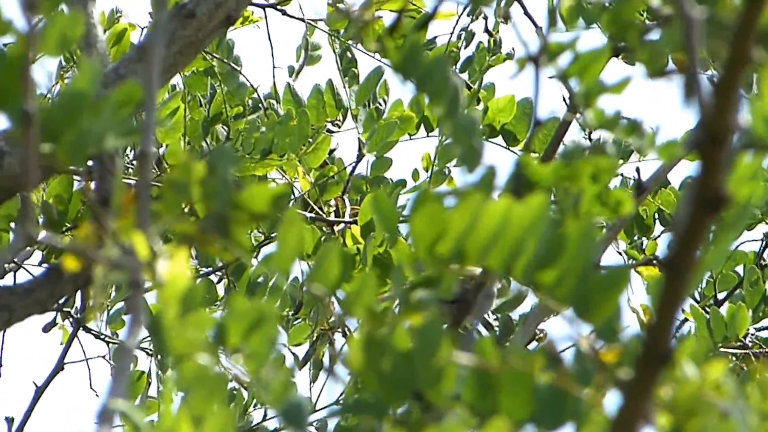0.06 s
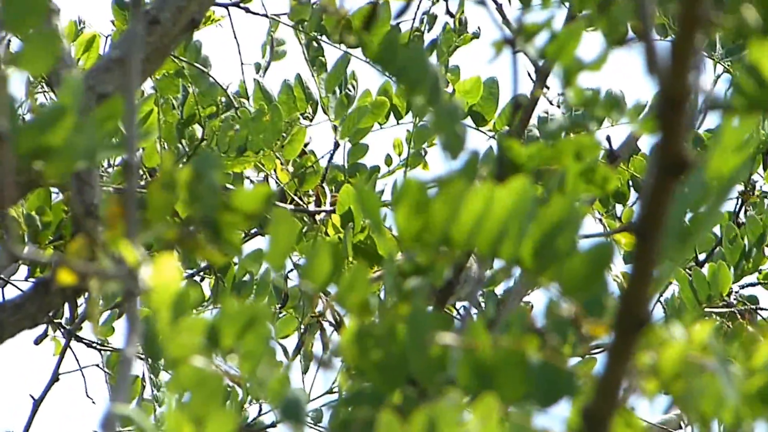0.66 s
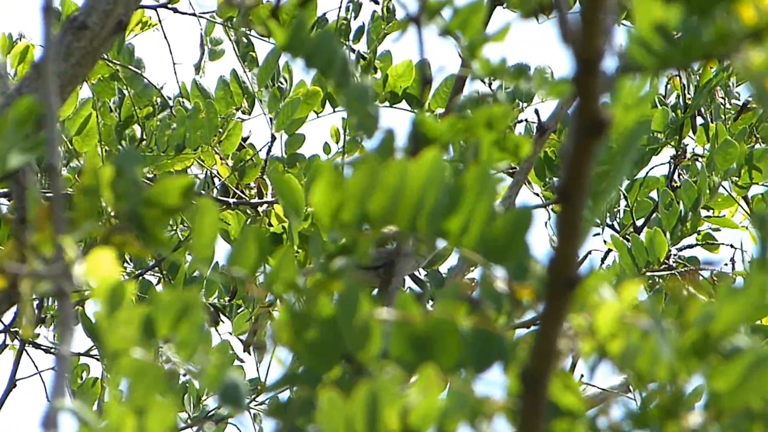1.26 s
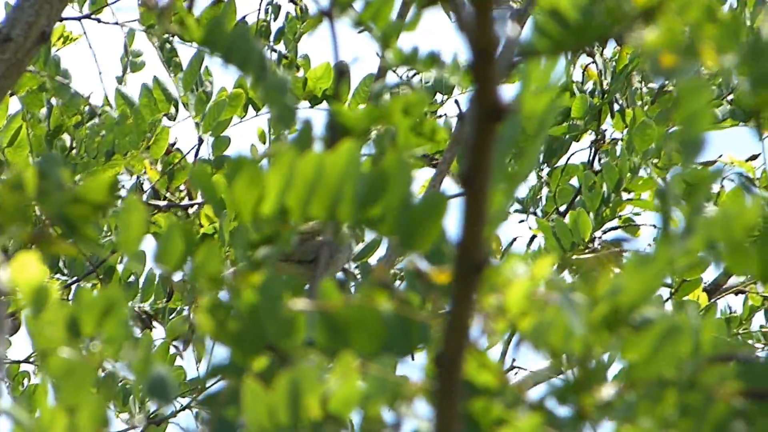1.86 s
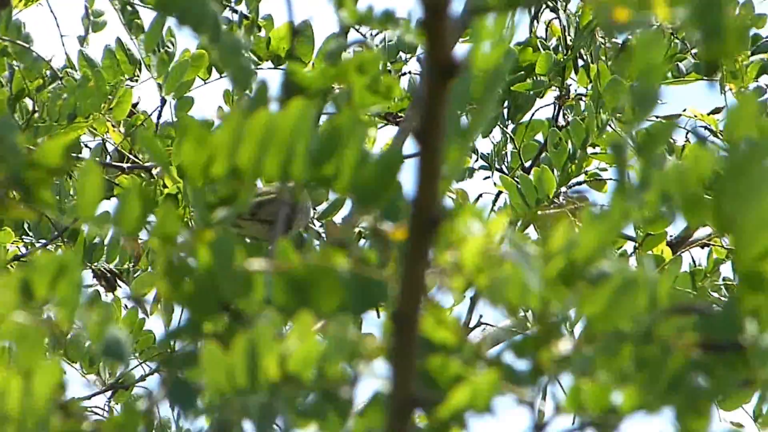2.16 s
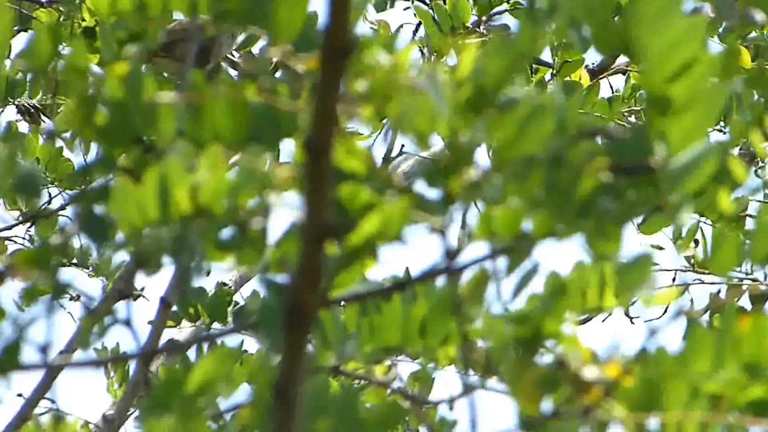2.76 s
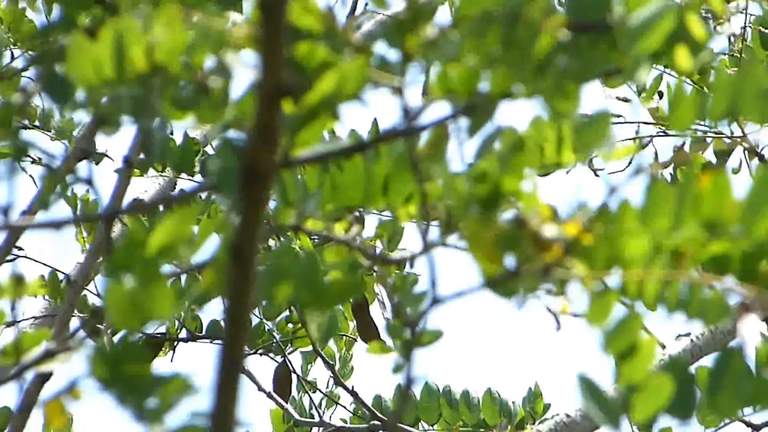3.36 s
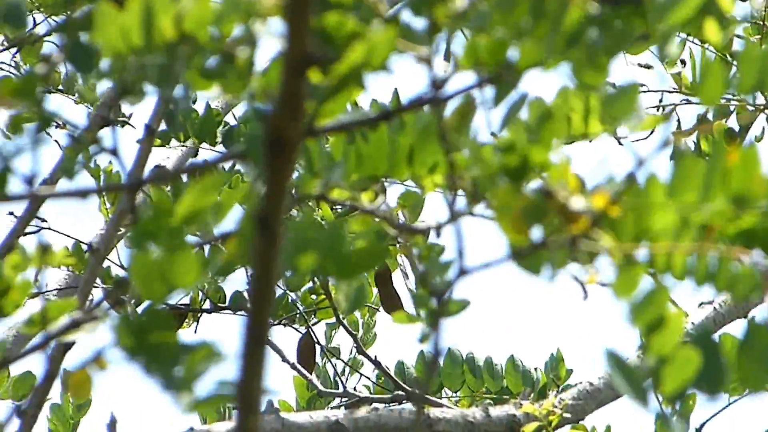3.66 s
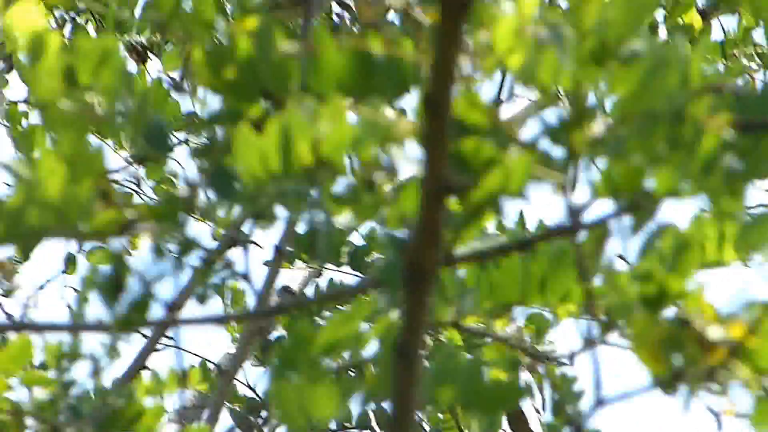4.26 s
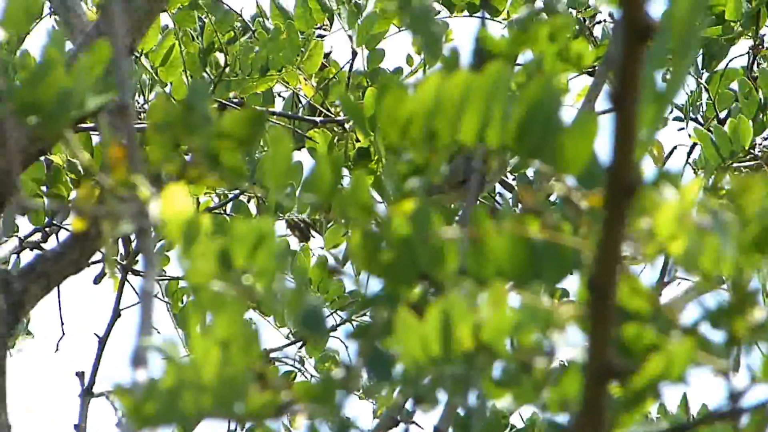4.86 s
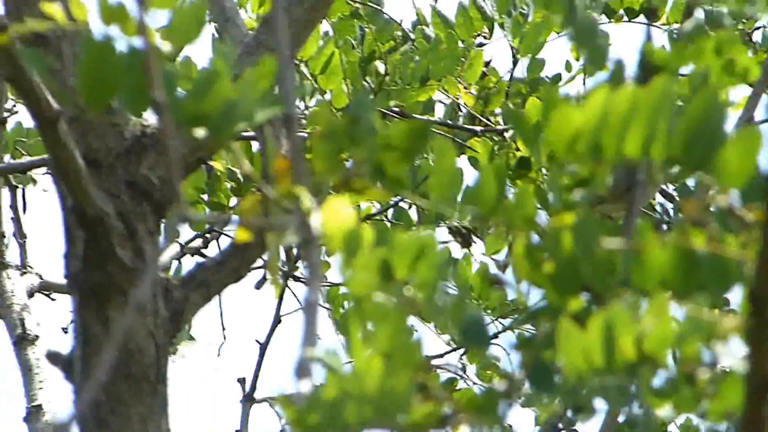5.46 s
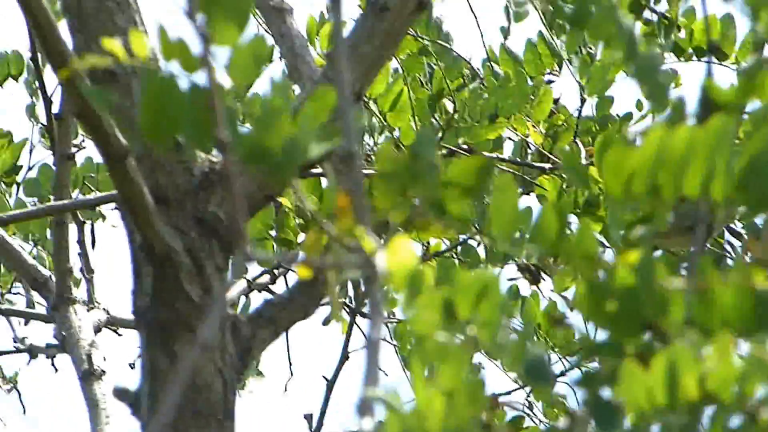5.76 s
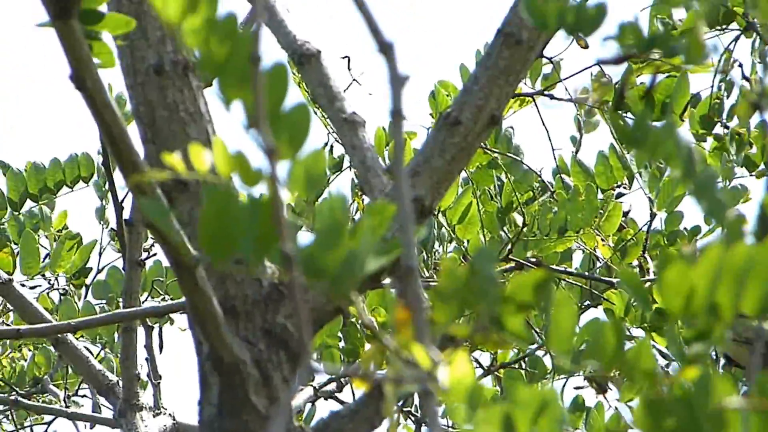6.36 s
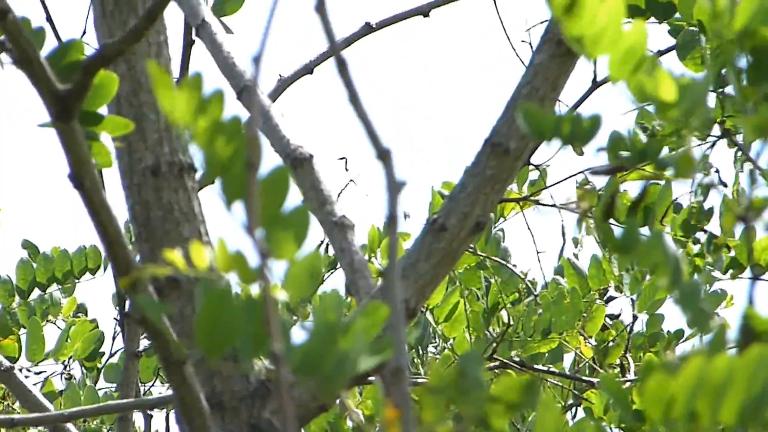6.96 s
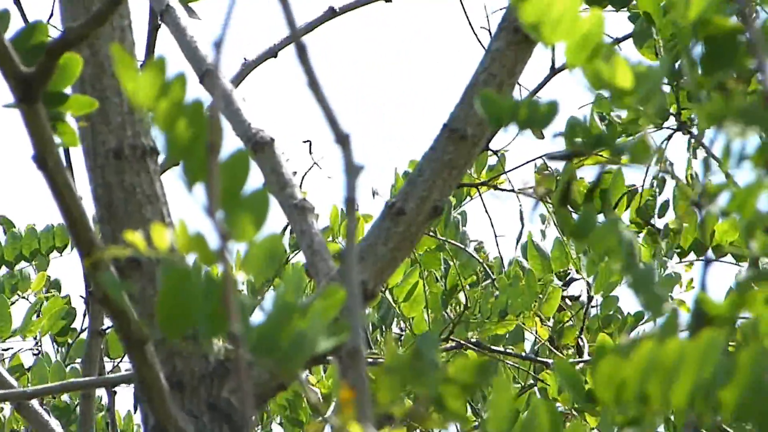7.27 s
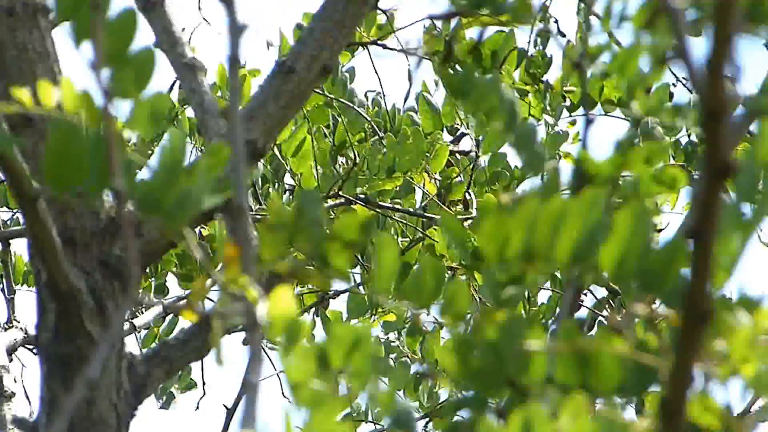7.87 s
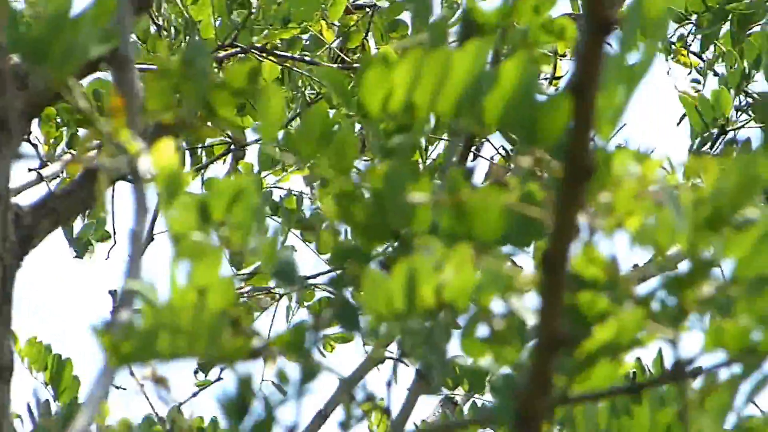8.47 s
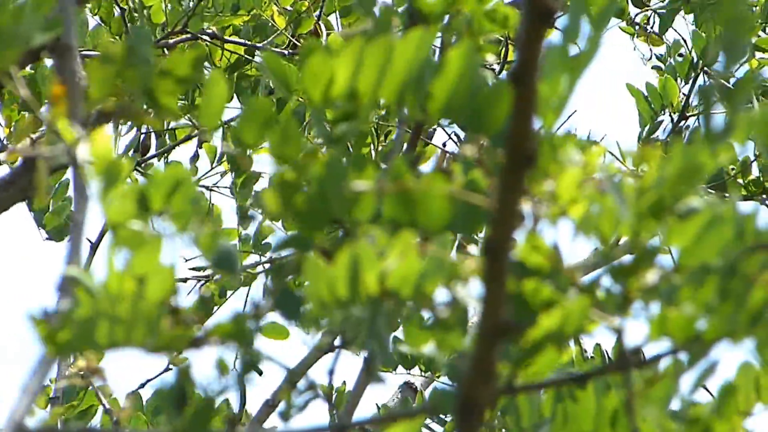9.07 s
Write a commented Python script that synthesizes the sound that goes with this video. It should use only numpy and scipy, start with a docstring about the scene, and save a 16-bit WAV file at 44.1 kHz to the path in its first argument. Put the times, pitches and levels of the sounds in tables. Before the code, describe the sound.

Short, clear chirps from a small bird in a tree, with faint calls from other birds and a quiet town hum behind.

```python
"""Songbird in a quiet suburb

A small bird in a leafy tree whistles short notes from its syrinx: rising chips, falling chews between.
Trunks and walls throw back brief echoes. Other birds add thin calls, and puff air through their throats
for churrs, chacks and a dry chatter. A hand-held camera ticks and scuffs over the hum of the town."""
import sys
import numpy as np
from scipy import signal
from scipy.fft import rfft, irfft, next_fast_len
from scipy.io import wavfile
from scipy.ndimage import uniform_filter1d

SR = 44100
rng = np.random.default_rng(int(sys.argv[2]) if len(sys.argv) > 2 else 0)


def transcribe(signal):
    """Save signal, clipped to [-1, 1], as a 16-bit WAV file at the path in sys.argv[1]."""
    frames = np.atleast_2d(signal).T
    limited = np.clip(frames, -1, 1)
    pcm = np.round(limited * 32767).astype(np.int16)
    wavfile.write(sys.argv[1], SR, pcm)


N = 402633

# rising notes; a negative droop keeps rising
# (time [s], top pitch [Hz], final droop [Hz], attack [s], level [dB], rasp, breath and overtones [dB])
CHIP_NOTES = [(.196, 3295, 150, 0.026, -21, 2), (1.152, 3590, 200, .031, -20.3, 2.5),
              (1.672, 2950, 330, 0.026, -19.5, -0.5), (2.027, 3420, 400, 0.027, -20.5, 3.5),
              (2.679, 3050, 135, .031, -17, -2.5), (3.068, 3370, 120, 0.026, -17.5, 4),
              (3.819, 3340, 350, 0.024, -16.5, 1.5), (4.605, 3037, 176, 0.028, -17, -1.5),
              (4.964, 3285, -170, 0.02, -17, 2.5), (5.678, 3372, 250, 0.024, -17.5, 1),
              (6.451, 3224, 480, .027, -21.5, 9), (7.506, 3520, 200, 0.036, -23, 5),
              (8.251, 3505, 152, 0.036, -21.5, 3.5)]
# falling notes; a negative dip is a lift
# (time [s], top pitch [Hz], attack [s], dip after the turn [dB], level [dB], breath and overtones [dB])
CHEW_NOTES = [(1.415, 2650, 0.027, -1, -20, 0.5), (2.339, 2784, 0.028, -1.5, -20, -3),
              (3.431, 2626, 0.024, 3, -18.7, 0), (4.242, 2815, .025, 4.5, -18.5, 1.5),
              (5.271, 2760, .02, 0, -19.5, 2.5), (6.038, 2870, .023, 5, -19, 2.5),
              (7.790, 2775, 0.029, 1.5, -26, -3)]
# overtones of the whistle (harmonic number, level in the body [dB], level at the start [dB])
SYRINX_OVERTONES = [(2, -27, -24.5), (3, -38.5, -32.5), (4, -43.5, -51), (5, -57, -49)]
# throat resonance that lifts an overtone early in a note (centre [Hz], width [Hz], boost [dB])
THROAT_RESONANCE = (3800, 900, 12)
# phrases of dry chatter (time [s], length [s], centre [Hz], level [dB])
CHATTER_PHRASES = [(8.83, 0.088, 3970, -37.5), (8.926, 0.073, 4260, -38.5), (9.033, 0.065, 4400, -42.5)]
# arched calls further off (time [s], length [s], top pitch [Hz], place of the top [share of length],
# pitch lost one call length from the top [share], level [dB])
ARCHED_CALLS = [(.442, 0.082, 5030, .6, .65, -55.5), (0.829, .075, 4950, 0.59, .8, -52),
                (7.921, .036, 6030, .15, 0.12, -43), (7.969, 0.042, 5990, .15, 0.19, -37.5),
                (8.195, .026, 2450, .6, .25, -40), (8.63, 0.048, 5830, 0.97, .1, -44),
                (8.683, 0.055, 5950, 0.32, 0.36, -44)]
# faint peeps on one pitch (time [s], length [s])
FAINT_PEEPS = [(1.05, 0.11), (1.35, 0.068), (2.197, .04), (2.738, .042), (4.724, 0.036), (5.18, 0.06)]
# single harsh chacks (time [s], level [dB])
CHACK_CALLS = [(.322, -48), (2.557, -52), (2.965, -44.5), (3.379, -44), (4.055, -52.5), (6.775, -44),
               (7.173, -41.5)]
# lower churrs of two syllables each (time [s], level [dB])
CHURR_CALLS = [(.405, -50.5), (7.578, -49), (7.768, -46), (8.177, -45), (8.313, -43.5), (8.473, -44)]
# hard reflections off nearby trunks (delay [s], level against the scatter [dB], left minus right [dB])
TRUNK_ECHOES = [(.008, -9, 3), (.013, -7, -4)]
# ticks on the camera (time [s], level [dB])
CAMERA_TICKS = [(.135, -39.5), (0.726, -44), (1.234, -40.5), (3.919, -41.5), (5.341, -40.5),
                (7.1426, -31.5), (8.147, -42), (8.45, -41)]
# ringing modes of its shell (frequency [Hz], time to fall 60 dB [s], level [dB])
SHELL_MODES = [(2260, 0.024, 6), (3780, 0.018, 5), (6600, 0.017, -3), (7400, 0.0053, 11.5)]
# scuffs of a finger (time [s], level [dB])
FINGER_SCUFFS = [(6.685, -43.5), (7.51, -46.5)]
# dull bumps of the grip (time [s], level [dB])
GRIP_BUMPS = [(6.745, -34), (6.763, -33.5)]
# low rumble of the town (frequency [Hz], relative level [dB])
RUMBLE_SPECTRUM = [(18, -72), (30, -32), (59, -33), (95, -12.5), (118, -6), (150, -10.5), (194, -2),
                   (253, -4.5), (302, 1), (420, -5.5), (550, -42), (920, -120)]
# distant traffic and the quiet air above it (frequency [Hz], relative level [dB])
TRAFFIC_SPECTRUM = [(330, -21.5), (470, -8.5), (600, 2.5), (780, -3.5), (1050, -4), (1290, -3), (1500, -13),
                    (1900, -13.5), (4400, -15), (6000, -19), (8500, -24), (10500, -32.5), (13500, -35.5),
                    (16000, -47)]
# stereo width: long waves reach both microphones much alike (frequency [Hz], side gain [dB])
STEREO_WIDTH = [(30, -5), (80, -17), (170, -12.5), (350, -6), (700, -9.5), (1500, -6.5), (4000, -9.5),
                (12000, -10.5)]
# the two humps of a far-off engine's drone (centre [Hz], width [Hz], relative level [dB])
ENGINE_BANDS = [(113.8, 43, -8), (209.6, 60, 0.5)]
# the drone's uneven swell (time [s], level [dB])
ENGINE_SWELL = [(4.3, -68), (5.1, -55.5), (5.7, -59.5), (6.4, -54.5), (7.6, -55), (8.3, -52.5),
                (9.13, -54.5)]

CHIP_S, CHIP_START_HZ, CHIP_TOP_S, CHIP_RELEASE_S = .045, 1853, .0335, .0055
# a higher chip climbs for longer: time constant at the usual top pitch, growing as a power of pitch
CLIMB_S, USUAL_TOP_HZ, CLIMB_POWER = .0135, 3322, 5.35
CHEW_S, CHEW_START_HZ, CHEW_END_HZ, CHEW_RELEASE_S = .053, 2432, 2023, .011
CHEW_TURN_S, SLIDE_S, DIP_AT_S, DIP_WIDTH_S = .018, .00942, .024, .0062
ONSET_DB, SAG_DB_PER_S = -50, 191  # air pressure in a note: starting level, sag after the attack
SYLLABLE_S, PUFF_GAP_S, PUFF_FALL_DB, PUFF_SCATTER_DB = .018, .0045, -2.5, 2.5
PEEP_HZ, PEEP_DB = 4220, -55
RUMBLE_DB, TRAFFIC_DB, TRAFFIC_FADE_DB_PER_S = -51.5, -44.5, .1925
HIGH_CUT_HZ = 15700


def songbird():
    """The lead bird; leaves scatter its high notes more than its low ones."""
    return outdoors(chips(), scatter_db=-8.5, t60=.33) + outdoors(chews(), scatter_db=-14.5, t60=.31)


def chips():
    """Each chip sweeps up from a low start, levels off and mostly droops before it is cut short."""
    out, t = np.zeros(N), seconds(CHIP_S)
    for s, top_hz, droop_hz, attack_s, db, harsh_db in CHIP_NOTES:
        climb_s = CLIMB_S * (top_hz / USUAL_TOP_HZ) ** CLIMB_POWER
        climb = np.expm1(-t / climb_s) / np.expm1(-CHIP_TOP_S / climb_s)
        droop = np.interp(t, [CHIP_TOP_S, CHIP_S], [0, droop_hz])
        hz = CHIP_START_HZ + (top_hz - CHIP_START_HZ) * climb - droop
        add(out, s, syrinx(t, hz, attack_s, CHIP_RELEASE_S, db, harsh_db, tremor=.0056))
        add(out, s - .005, undb(db + harsh_db - 18.5) * rasp())
    return out


def chews():
    """Each chew arches over, slides down and fades; the level dips or lifts briefly after the turn."""
    out, t = np.zeros(N), seconds(CHEW_S)
    rise = np.minimum(t / CHEW_TURN_S, 1)
    slide = 1 / (1 + (np.maximum(t - CHEW_TURN_S, 0) / SLIDE_S) ** 2)
    dip = np.exp(-((t - DIP_AT_S) / DIP_WIDTH_S) ** 2)
    for s, top_hz, attack_s, dip_db, db, harsh_db in CHEW_NOTES:
        hz = CHEW_END_HZ + (top_hz - CHEW_END_HZ) * slide - (top_hz - CHEW_START_HZ) * (1 - rise)
        chew = syrinx(t, hz, attack_s, CHEW_RELEASE_S, db, harsh_db, tremor=.011)
        add(out, s, chew * undb(-dip_db * dip))
        add(out, s - .005, undb(db - 20.5) * rasp())
    return out


def syrinx(t, hz, attack_s, release_s, db, harsh_db, tremor):
    """One note: the syrinx starts rich in overtones, then settles into a nearly pure whistle."""
    n = len(t)
    hz = hz * (1 + tremor * walk(882, n))
    attack_db = (ONSET_DB - db) * np.maximum(1 - t / attack_s, 0) ** 2
    body = undb(attack_db - SAG_DB_PER_S * np.maximum(t - attack_s, 0))
    start = np.exp(-(t / t[-1] / .45) ** 2)
    tension = np.minimum(hz / 2900, 1) ** 4  # a tenser, higher syrinx gives stronger overtones
    throat_hz, width_hz, throat_db = THROAT_RESONANCE
    bright = undb(-37) * body * hiss(n, 5000, 6000)  # breath under the overtones
    for harmonic, body_db, start_db in SYRINX_OVERTONES:
        partial_hz = harmonic * hz
        envelope = undb(body_db) * body * tension + undb(start_db) * start
        lift_db = throat_db * start * np.exp(-((partial_hz - throat_hz) / width_hz) ** 2)
        bright += envelope * undb(lift_db + 2 * walk(81, n)) * sine(partial_hz)
    fades = np.clip(t / .0022, 0, 1) * np.clip((t[-1] - t) / release_s, 0, 1)
    return undb(db) * (np.sqrt(2) * body * sine(hz) + undb(harsh_db) * bright) * fades


def rasp():
    """The scrape of air just before the whistle takes hold."""
    u = progress(.017)
    return np.sin(np.pi * u) * (hiss(len(u), 3620, 1600) + undb(-16.5) * hiss(len(u), 4500, 8000))


def chatter():
    """Phrases swell and fade; each dry syllable is three stumbling puffs that ring the throat."""
    out, t = np.zeros(N), np.arange(SR // 80) / SR
    for s, length, hz, db in CHATTER_PHRASES:
        for onset in np.arange(0, length, SYLLABLE_S):
            swell = np.sin(np.pi * (onset + SYLLABLE_S / 2) / (length + SYLLABLE_S))
            for k, (late, loud, high) in enumerate(rng.standard_normal((3, 3))):
                puff = t * np.exp(-t / .0015) * rng.standard_normal(len(t))
                ring = band(puff, hz * (1 + .04 * high), .38 * hz)
                delay = k * PUFF_GAP_S * (1 + .4 * late)
                puff_db = db + k * PUFF_FALL_DB + PUFF_SCATTER_DB * loud
                add(out, s + onset + delay, swell * level(ring, puff_db))
    return out


def thin_calls():
    """Birds further off: arched whistles and faint peeps on one pitch."""
    out = np.zeros(N)
    for s, length, top_hz, crest, arch, db in ARCHED_CALLS:
        u = progress(length)
        add(out, s, quaver(u, top_hz * (1 - arch * (u - crest) ** 2), db, tremor=.02))
    for s, length in FAINT_PEEPS:
        add(out, s, quaver(progress(length), PEEP_HZ, PEEP_DB, tremor=.006))
    return out


def quaver(u, hz, db, tremor):
    """A high whistle with a fast, uneven shake in level and pitch."""
    swell = np.abs(np.sin(np.pi * u)) ** .7 * undb(3 * walk(200, len(u)))
    return undb(db) * np.sqrt(2) * swell * sine(hz * (1 + tremor * walk(882, len(u))))


def harsh_calls(calls, syllables_s, length_s, hz, spread, pulse_hz, rough):
    """Noisy syllables: uneven pulses of air through one wide throat resonance."""
    out, u = np.zeros(N), progress(length_s)
    swell = np.sqrt(np.abs(np.sin(np.pi * u)))
    for s, db in calls:
        for delay in syllables_s:
            pulses = 1 + rough * sine(glide(u, [pulse_hz, pulse_hz], jitter=.24))
            add(out, s + delay, level(swell * pulses * hiss(len(u), hz, spread * hz), db))
    return out


def outdoors(x, scatter_db, t60):
    """Stereo space: direct sound, slaps off trunks and a short tail from branches and houses."""
    t = np.arange(SR // 2) / SR
    twigs = rng.standard_normal((3, len(t))) * (rng.random((3, len(t))) < .1)
    sides = twigs[0] + .47 * twigs[1:]  # sparse reflections, mostly shared by left and right
    build_up = 1 - np.exp(-(t / .015) ** 2)
    scatter = sides * decay(t, t60) * build_up
    response = scatter * undb(scatter_db) / np.sqrt(np.sum(scatter[0] ** 2))
    response[:, 0] += undb([.4, -.4])  # direct sound, a touch to the left
    for delay, db, pan_db in TRUNK_ECHOES:
        response[:, int(delay * SR)] += undb(scatter_db + db + np.array([pan_db, -pan_db]) / 2)
    return signal.fftconvolve(x[None], response, axes=1)[:, :N]


def camera_ticks():
    """Ticks ring the shell; a harder one is a shorter contact and reaches the higher modes."""
    out, t = np.zeros(N), np.arange(SR // 20) / SR
    for s, db in CAMERA_TICKS:
        contact_hz = 5000 * undb(.43 * (db + 33.5))
        ring = np.zeros(len(t))
        for hz, t60, mode_db in SHELL_MODES:
            gain = undb(mode_db) / np.hypot(1, hz / contact_hz)
            ring += gain * decay(t, t60) * np.sin(2 * np.pi * hz * t)
        crack = np.exp(-t / .0021) * hiss(len(t), contact_hz, 1.3 * contact_hz)
        add(out, s, undb(db) * (.82 * ring + 1.03 * crack))
    return out


def finger_scuffs():
    """A finger rubs over the camera: short swipes of friction noise."""
    out, u = np.zeros(N), progress(.08)
    n = len(u)
    scuff = hiss(n, 1110, 1130) + undb(-4.5) * hiss(n, 2274, 160) + undb(-9) * hiss(n, 3800, 2500)
    for s, db in FINGER_SCUFFS:
        add(out, s, undb(db) * scuff * np.abs(np.sin(np.pi * u)) ** .15)
    return out


def grip_bumps():
    """The grip bumps twice, each a dull, slightly rising blip."""
    out, u = np.zeros(N), progress(.011)
    for s, db in GRIP_BUMPS:
        add(out, s, undb(db) * np.sin(np.pi * u) * sine(glide(u, [900, 1050], jitter=.034)))
    return out


def suburb():
    """The bed: a steady rumble, slowly receding traffic and a far-off engine that drones louder."""
    t = np.arange(N) / SR
    rumble = ambience(RUMBLE_SPECTRUM, pan_db=-2.5) * undb(RUMBLE_DB)
    traffic = ambience(TRAFFIC_SPECTRUM, pan_db=-1.54) * undb(TRAFFIC_DB - TRAFFIC_FADE_DB_PER_S * t)
    drone = sum(level(band(rng.standard_normal(N), hz, width), db) for hz, width, db in ENGINE_BANDS)
    swell = undb(np.interp(t, *np.transpose(ENGINE_SWELL)))
    return rumble + traffic + level(drone, 0) * swell


def ambience(spectrum, pan_db, flutter_db=.5):
    """Far-off noise that wavers a little and reaches the two microphones partly alike."""
    mid, side = colour(rng.standard_normal((2, N)), spectrum)
    left_right = np.array([[1], [-1]])
    pair = level(mid, 0) + colour(level(side, 0), STEREO_WIDTH) * left_right
    return pair * undb(left_right * pan_db / 2 + flutter_db * walk(5.1, N))


def undb(db):
    """Decibels to gain."""
    return 10 ** (np.asarray(db) / 20)


def level(x, db):
    """Scale to an rms level."""
    return x * undb(db) / np.sqrt(np.mean(x ** 2))


def add(track, s, sound):
    """Mix a sound into a track from time s on."""
    i = max(int(s * SR), 0)
    track[i:i + len(sound)] += sound[:max(N - i, 0)]


def progress(length):
    """Ramp from 0 to 1 over a length in seconds."""
    return np.linspace(0, 1, max(int(length * SR), 32))


def seconds(length):
    """Time axis of a sound of that length."""
    return progress(length) * length


def decay(t, t60):
    """Envelope that falls 60 dB in t60 seconds."""
    return np.exp(-np.log(1000) * t / t60)


def sine(hz):
    """Oscillator that follows a pitch curve."""
    return np.sin(2 * np.pi * np.cumsum(hz) / SR)


def glide(u, pitches, jitter):
    """Smoothed pitch curve through evenly spaced points, with a random tremor."""
    hz = np.interp(u, np.linspace(0, 1, len(pitches)), pitches)
    hz = uniform_filter1d(hz, size=len(u) // 7, mode="nearest")
    return hz * (1 + jitter * walk(882, len(u)))


def walk(rate, n):
    """Random wander with a spread near 1 and `rate` turns a second."""
    points = rng.standard_normal(int(N / SR * rate) + 2)
    return np.interp(np.arange(n) / SR * rate, np.arange(len(points)), points)


def band(x, hz, width_hz):
    """Band-pass with steep skirts."""
    edges = np.clip([hz - width_hz / 2, hz + width_hz / 2], 30, SR / 2 - 100)
    return signal.sosfilt(signal.butter(3, edges, "band", fs=SR, output="sos"), x)


def hiss(n, hz, width_hz):
    """n samples of band noise, rms near 1."""
    return level(band(rng.standard_normal(SR // 2), hz, width_hz), 0)[-n:]


def colour(x, points):
    """Equalise along a curve of (frequency [Hz], gain [dB]) points."""
    hz, db = np.transpose(points)
    size = next_fast_len(N)
    f = np.maximum(np.fft.rfftfreq(size, 1 / SR), 1)
    gain = undb(np.interp(np.log(f), np.log(hz), db))
    return irfft(rfft(x, size) * gain, size)[..., :N]


def scene():
    """The mix: lead bird up front, neighbours deeper in the trees, handling noise and the suburb."""
    chacks = harsh_calls(CHACK_CALLS, [0], length_s=.04, hz=3550, spread=.53, pulse_hz=174, rough=.17)
    churrs = harsh_calls(CHURR_CALLS, [0, .053], length_s=.042, hz=2490,
                         spread=.41, pulse_hz=166, rough=.29)
    scold = outdoors(chatter(), scatter_db=-7, t60=.35)
    far_birds = outdoors(thin_calls() + chacks + churrs, scatter_db=-7, t60=.45)
    birds = songbird() + scold + far_birds
    handling = camera_ticks() + finger_scuffs() + grip_bumps()
    return birds + handling + suburb()


def record(dry):
    """The recorder cuts the top with a steep low-pass."""
    return signal.sosfilt(signal.ellip(10, .2, 80, HIGH_CUT_HZ, fs=SR, output="sos"), dry)


dry = scene()
out = record(dry)
transcribe(out)
```